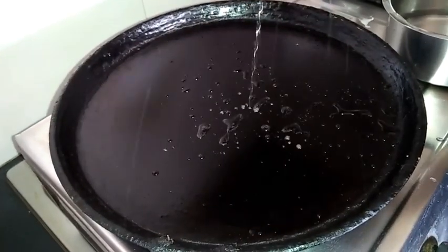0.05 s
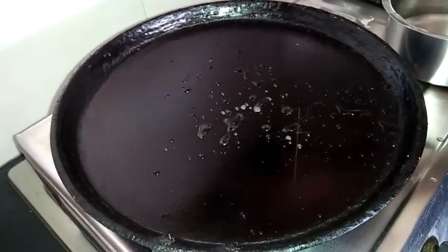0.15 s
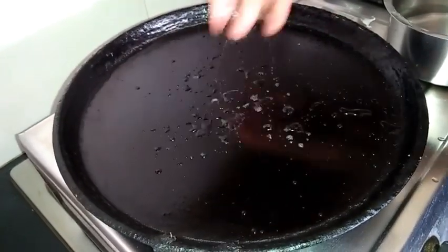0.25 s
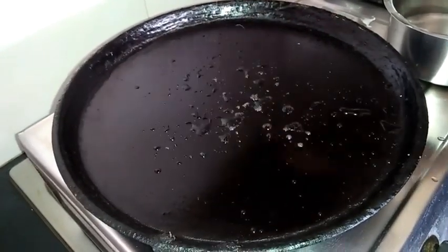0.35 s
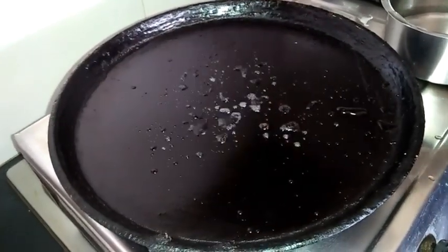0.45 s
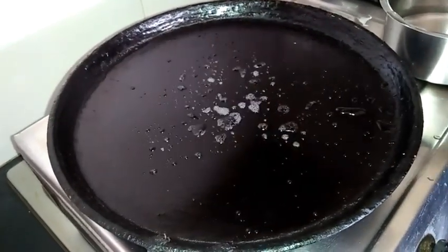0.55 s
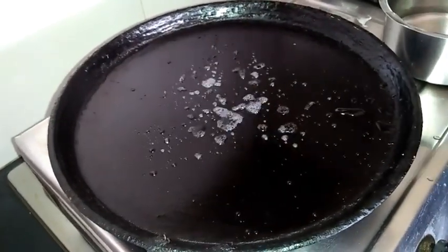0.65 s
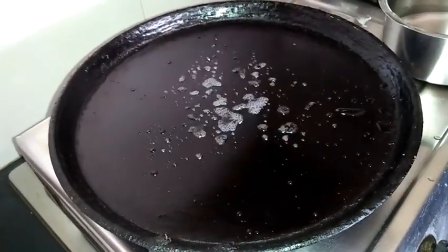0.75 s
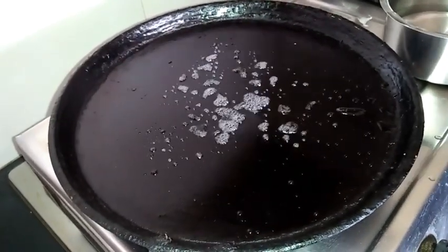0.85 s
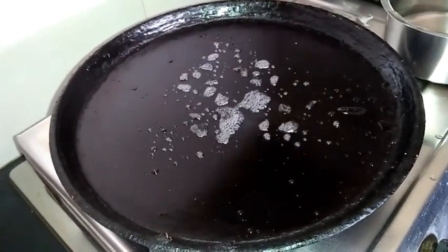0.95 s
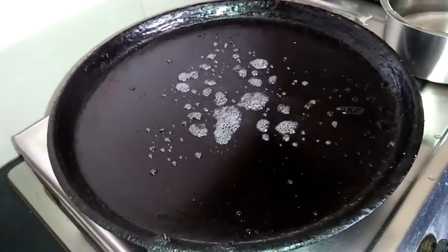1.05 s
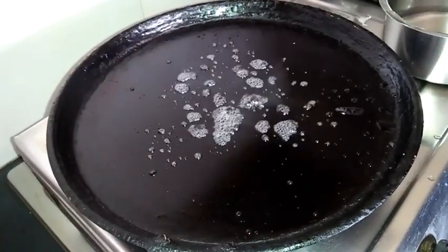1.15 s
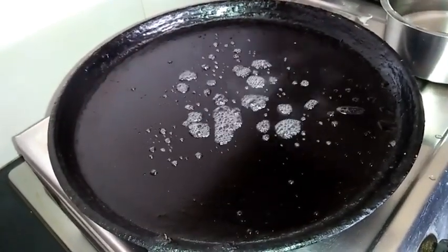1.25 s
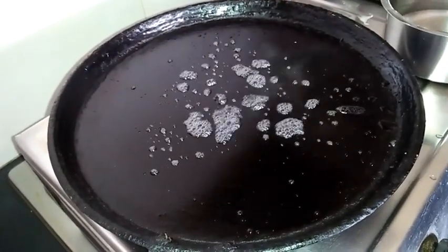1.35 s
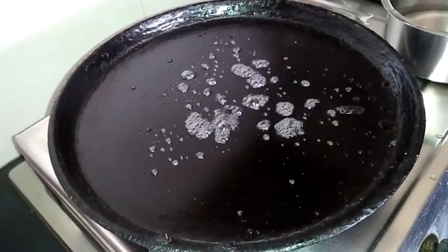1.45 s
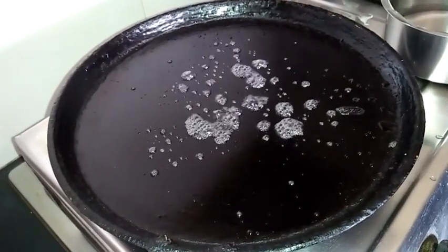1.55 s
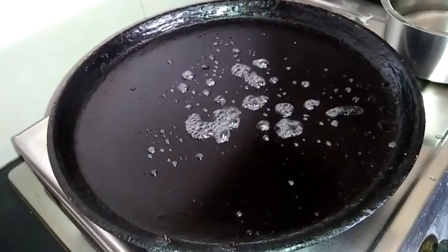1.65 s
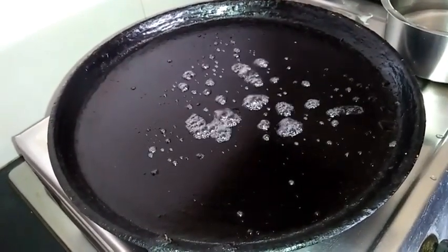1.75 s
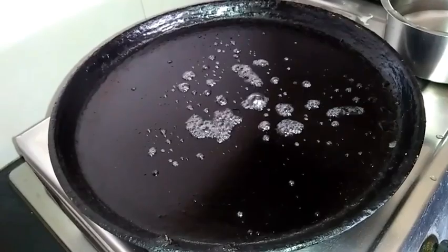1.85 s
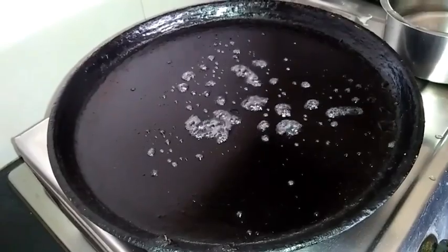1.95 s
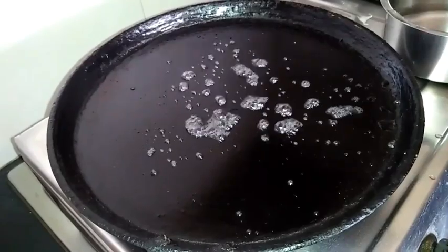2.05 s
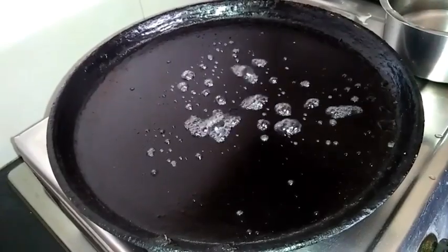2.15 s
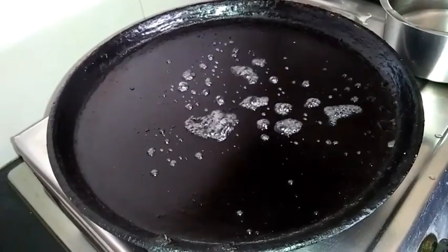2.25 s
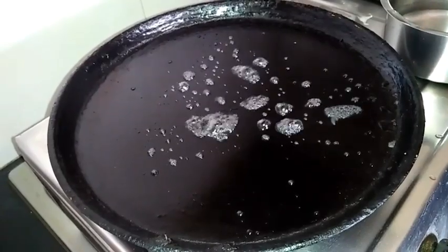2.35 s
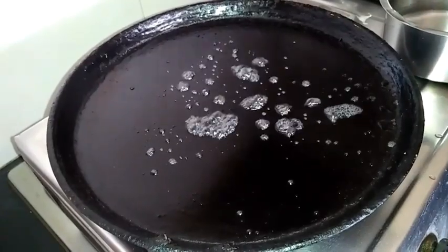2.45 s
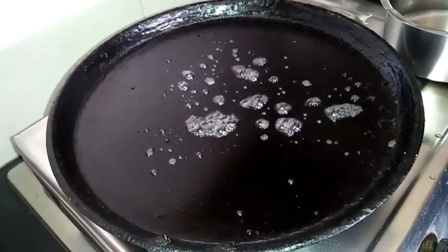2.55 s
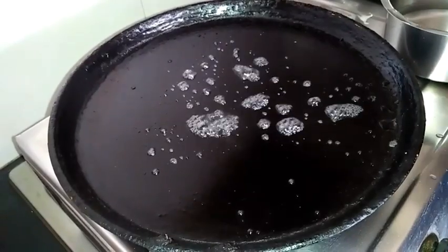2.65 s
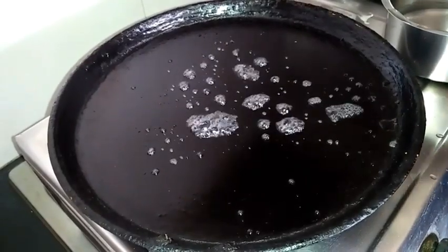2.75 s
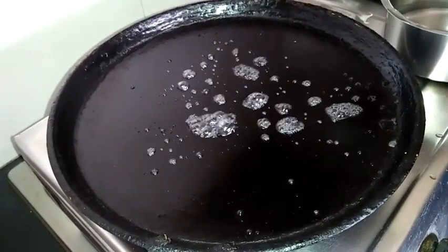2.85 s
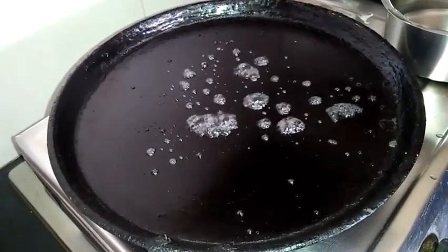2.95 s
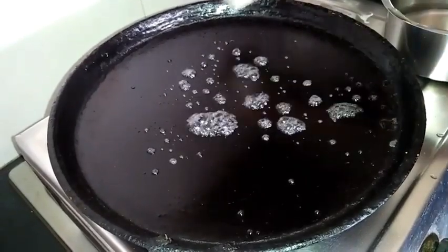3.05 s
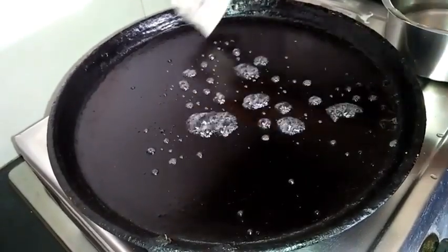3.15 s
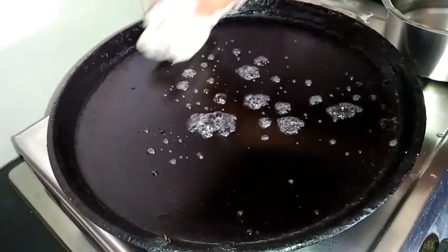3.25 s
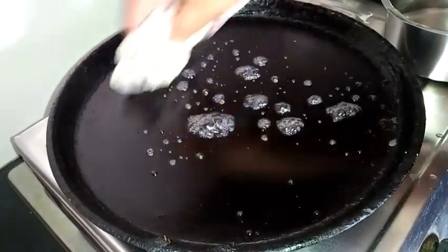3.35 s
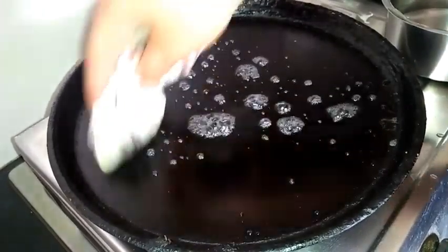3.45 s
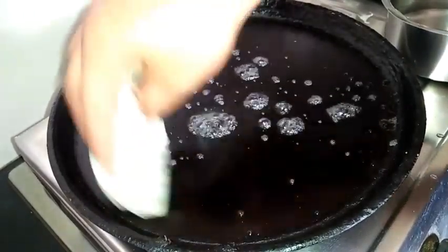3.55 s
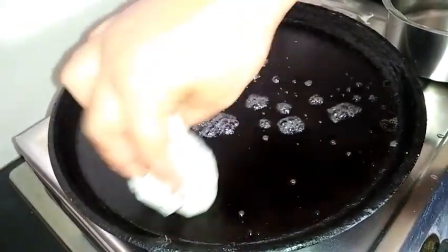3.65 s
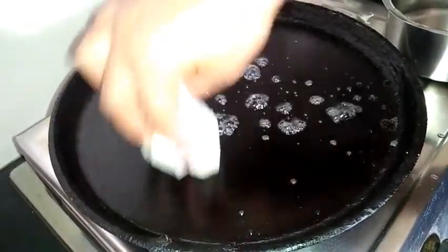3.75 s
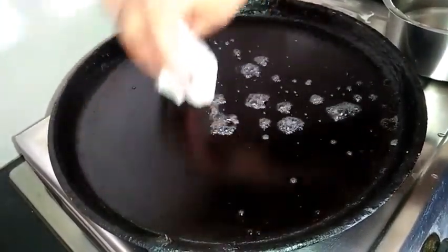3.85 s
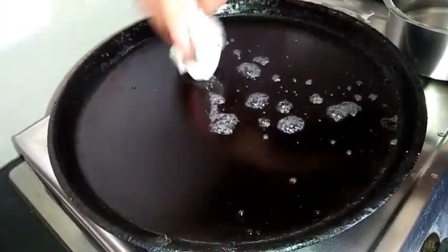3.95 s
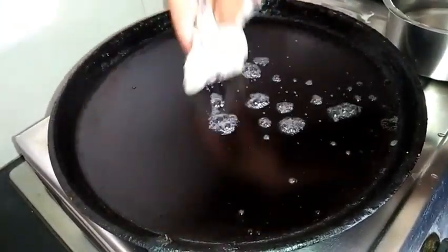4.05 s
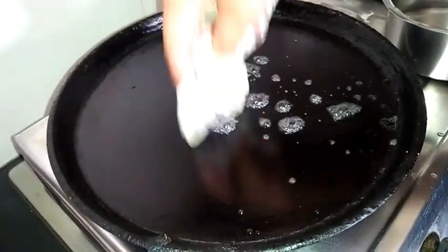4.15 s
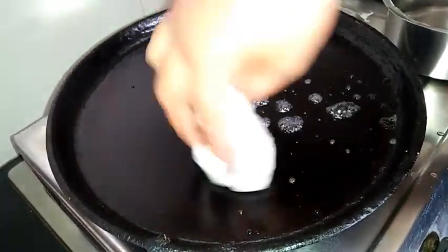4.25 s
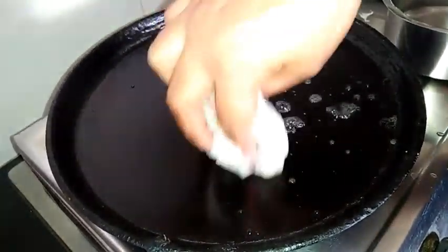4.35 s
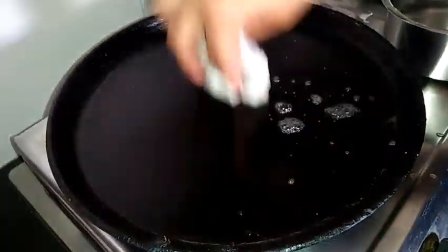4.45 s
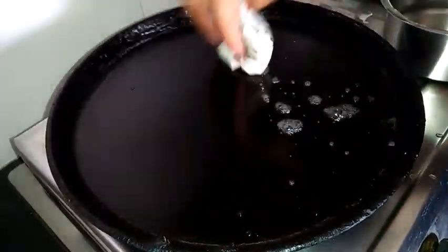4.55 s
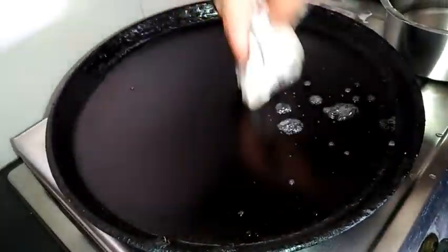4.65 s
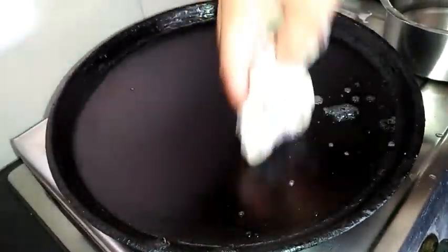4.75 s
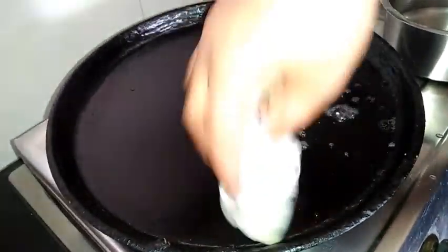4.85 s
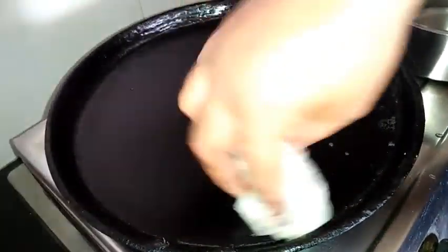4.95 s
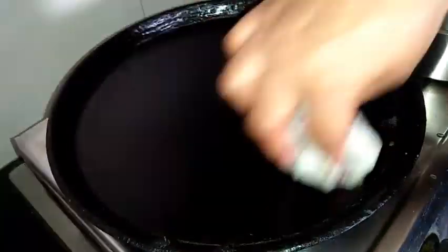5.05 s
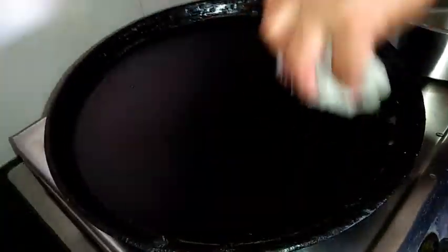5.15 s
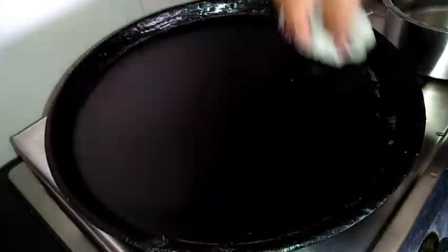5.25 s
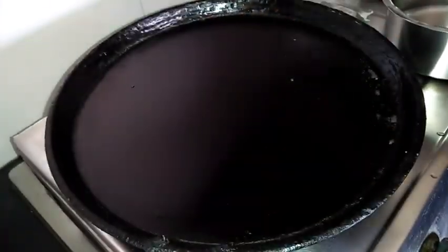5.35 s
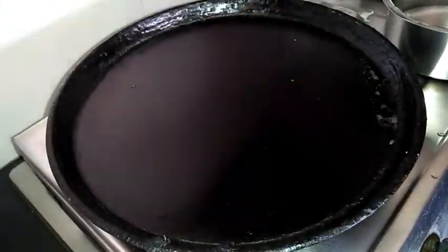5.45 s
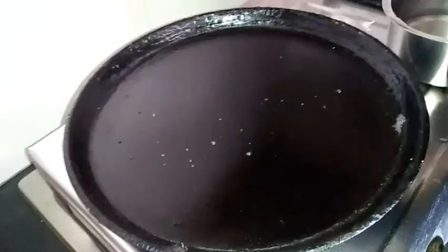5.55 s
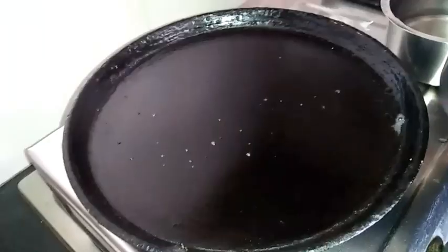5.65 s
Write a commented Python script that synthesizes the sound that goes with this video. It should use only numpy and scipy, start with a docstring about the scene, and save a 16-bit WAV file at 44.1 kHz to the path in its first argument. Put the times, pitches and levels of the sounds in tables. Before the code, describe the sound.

Water sizzles on a hot cast-iron griddle, heard close in a small, quiet kitchen. It begins as a faint, high hiss, and a steel bowl clinks lightly at about 0.3 seconds, ringing faintly afterwards. The sizzle builds until 1.5 seconds, with light bubbling underneath and many tiny spits. One sharp snap stands out at 1.8 seconds, then the hiss eases and keeps crackling.

At 3.4 seconds a wet cloth lands with a soft knock and the hiss rises. Short, quiet rasping strokes follow until 5.3 seconds. The sizzle surges in waves, loudest around 4.2 and 4.8 seconds, with hoarse spurts of steam and sharp pops near 4.2 and 4.5 seconds. The griddle knocks dully on the stove a few times, most clearly at 4.4 seconds. From 5.4 seconds the hiss drops away quickly, leaving one last faint crackle at about 5.6 seconds.

```python
"""Water sizzles on a hot cast-iron griddle in a small kitchen: flicked drops boil, spit and shrink,
and their countless bursting bubbles merge into a hiss. A steel water bowl clinks and sings faintly
in its normal modes. A wet cloth rasps over the iron and presses the puddles flat: the sizzle surges,
trapped steam whistles out and the griddle knocks on the stove. Wiped dry, the iron falls quiet,
and a last bit of water crackles."""
import sys
import numpy as np
from scipy import signal
from scipy.fft import rfft, irfft
from scipy.io import wavfile
from scipy.ndimage import uniform_filter1d

SR = 44100
rng = np.random.default_rng(int(sys.argv[2]) if len(sys.argv) > 2 else 0)


def store_pcm(level_fs):
    """Save levels as 16-bit WAV."""
    pcm = np.round(np.clip(level_fs, -1, 1) * 32767).astype(np.int16)
    wavfile.write(sys.argv[1], SR, np.atleast_2d(pcm).T)


N = 251186
T = np.arange(N) / SR
HZ = np.maximum(np.fft.rfftfreq(2 * N, 1 / SR), 1)

# Normal modes of the steel bowl. Each row: frequency in Hz, level in dB, t60 in seconds.
BOWL_MODES = [(1259, -14, .55), (1698, 0, .54), (2108, 1, .19), (3020, -17.5, .29), (3345, -17, .18),
              (3898, -13, .14), (4097, -12, .07), (4305, -8, .09)]


def sizzle():
    """Shot noise: bubbles burst in spurts, and the harder the water boils, the denser they come."""
    # Spectra of the hiss and of the lower simmer. Each row: frequency in Hz, level in dB.
    hiss_spectrum = [(1800, -49), (2900, -12.5), (3700, -22), (4500, -23), (5600, -16), (6600, -12),
                     (7600, -5), (8900, -2), (10500, -5.5), (12300, -7), (14400, -7)]
    simmer_spectrum = [(90, -25), (150, -17), (220, -27), (300, -14), (390, -21.5), (700, -8), (950, -3.5),
                       (1600, -1), (2150, 0.5), (2600, -6), (3600, -7), (4600, -24), (6000, -24.5)]
    boil_db, flutter_db, coarse_db, fine_db = boiling()
    vigour_db = boil_db + 50
    rate = 4200 * undb(.7 * vigour_db)  # bursts a second
    spurts = undb(.79 * walk(55) + .47 * walk(200)) * unit(sputter(rate=55, size_db=-7, t60=.11))
    pops = spurts * bursts(rate, spread_db=2.5, steam_db=2)
    wide = spurts * bursts(rate, spread_db=10, steam_db=12)
    # The skin of free drops snaps in dry crackles; crushed drops do so less.
    crackle = chirps(rate=420, centre_hz=9000, scatter=.3, spread_db=3.2, life_s=.0007, glide=10)
    # Steam escapes from under the drops in hoarse puffs with a trace of pitch.
    puffs = chirps(rate=70, centre_hz=8100, scatter=.28, spread_db=3.2, life_s=.009, glide=8, hoarse=.07)
    hard_db = np.maximum(vigour_db, 0)
    fizz = pops + crackle * undb(-10.5 - .1 * hard_db) + puffs * undb(-8 - .5 * hard_db)
    fizz = walls(fizz, wet_db=-9, t60=.2, spots=4)
    fizz += undb(-4) * np.array([[1], [-1]]) * shape(wide, above(4160))
    # Large bubbles sound low, fine spray high.
    colour, small, finest = response(hiss_spectrum), above(7660), above(11570)
    bands = [(1 - small, coarse_db - .5), (small - finest, -1), (finest, fine_db - .3)]
    hiss = sum(unit(shape(fizz, colour * band)) * undb(db + 1.4 * walk(40)) for band, db in bands)
    # The puddles flutter and blip against the griddle and set it ringing.
    flutter = unit(pops + spurts * bursts(rate, spread_db=4.5, steam_db=-10))
    blips = chirps(rate=260, centre_hz=1400, scatter=1.1, spread_db=3.3, life_s=.012, glide=4)
    flutter = walls(flutter + undb(-11.5) * blips, wet_db=-5, t60=.2, spots=4)
    simmer = unit(shape(flutter, response(simmer_spectrum) * griddle(iron_db=8, bowl_db=10)))
    return undb(boil_db) * hiss + simmer * undb(flutter_db - 1.24 + .55 * walk(28))


def boiling(gather_s=.97, cloth_down_s=3.368, cloth_up_s=5.35, attack_s=.15):
    """Incoherent sources add in power. In dB: hiss, flutter, and coarse and fine shares of the hiss."""
    # Free puddles spread, stall, shrink and are wiped away. Each row: time in seconds, level in dB.
    puddle_levels = [(0, -67.5), (.25, -61.5), (.5, -60), (.8, -52.5), (1.05, -49.5), (1.44, -46.5),
                     (1.65, -50), (2.02, -52.5), (2.07, -58), (2.16, -55.5), (2.42, -56), (2.95, -56),
                     (3.35, -54.5), (4.9, -51.5), (5.4, -55), (5.55, -108)]
    # Drops flare up and boil off. Each row: start in seconds, level in dB, t60 in seconds.
    flares = [(0.295, -58, 1.4), (.585, -56.5, 0.71), (2.165, -56, 1.1), (2.379, -52.5, 1.24),
              (2.585, -60.5, 1.8), (3.078, -60, 1.6), (3.455, -65, .25), (5.629, -62, 1.9)]
    # Crushed puddles boil off in one swell. Each row: start and length in seconds, level in dB,
    # flutter and fine spray in dB relative to that level.
    crushes = [(3.769, 0.47, -44, -9.5, -8), (3.95, 0.22, -42, -11, -1), (4.123, 0.22, -37, -14, -5),
               (4.296, 0.37, -38, -6.5, -8), (4.604, 0.27, -42, -9.5, -0.5), (4.728, 0.36, -35, -17, -1.5),
               (5.067, 0.33, -37, -20, -2)]
    puddle_db, = curves(puddle_levels)
    flare_power = sum((undb(db) * fade(t60, s)) ** 2 for s, db, t60 in flares)
    free = np.sqrt(undb(puddle_db) ** 2 + flare_power)
    vigour_db = 20 * np.log10(free) + 50
    fresh = np.clip(1 - T / gather_s, 0, 1)  # drops spray finely until they gather into puddles
    contact = np.clip((T - cloth_down_s) / attack_s, 0, 1)
    contact *= np.where(T < cloth_up_s, 1, fade(t60=.23, start=cloth_up_s))
    # Each row: hiss amplitude, then flutter, coarse bubbles and fine spray in dB relative to it.
    waters = [
        (free, -10.5 - .2 * vigour_db, -8 + .41 * vigour_db, -8 + 10.5 * fresh),
        (undb(-46.5) * contact, -11.5, -13, -4.5),  # the wet cloth hisses while it lies on the iron
    ]
    for s, length, db, flutter_db, spray_db in crushes:
        waters.append((undb(db) * swell(s, length), flutter_db, -13, spray_db))  # few large bubbles
    power = 0
    for amplitude, *shares_db in waters:
        power += np.array([(amplitude * undb(db)) ** 2 for db in (0, *shares_db)])
    hiss, flutter, coarse, fine = 10 * np.log10(power)
    return hiss, flutter, coarse - hiss, fine - hiss


def bursts(rate, spread_db, steam_db):
    """A Poisson process: random clicks, most faint and a few loud, over smooth white noise."""
    sizes = undb(spread_db * np.minimum(rng.exponential(size=N), 6))
    clicks = (rng.random(N) < rate / SR) * sizes * rng.choice([-1, 1], N)
    return unit(unit(clicks) + undb(steam_db) * rng.standard_normal(N))


def chirps(rate, centre_hz, scatter, spread_db, life_s, glide, hoarse=.037):
    """Each bubble is a damped oscillator: a tiny unsteady tone with its own pitch, size and glide."""
    out, t = np.zeros(N), T[:SR // 16]
    wobble = walk(900)
    for when, size, pitch, length, bend, offset in rng.random((int(rate * N / SR), 6)):
        hz = centre_hz * np.exp(scatter * (2 * pitch - 1))
        i = int(offset * (N - len(t)))
        sweep_hz = hz * (1 + glide * (bend - .5) * t + hoarse * wobble[i:i + len(t)])
        tone = np.sin(2 * np.pi * np.cumsum(sweep_hz) / SR)
        age = t / (life_s * (length + .55))
        amplitude = undb(-spread_db * np.log(max(size, .03)))
        add(out, when * N / SR, amplitude * age * np.exp(-2 * age) * tone)
    return unit(out)


def sputter(rate, size_db, t60):
    """Amplitude modulation by small fits of boiling: each starts at once and decays exponentially."""
    fits = (rng.random(N) < rate / SR) * rng.exponential(size=N)
    power = np.abs(signal.oaconvolve(fits, fade(t60 / 2)[:SR // 4])[:N])
    return np.sqrt(1 + undb(size_db) ** 2 * power)


def spits(width_hz=4800, click_s=.00024, spatter_attack_s=.0008, hard_db=-18):
    """Impulsive sources: a drop blows apart with a click, a spatter and, if hard, a bright snap."""
    # Spitting drops. Each row: start in seconds, level in dB, pitch in Hz,
    # then the spatter and the crack on the iron in relative dB.
    drops = [(.0462, -43, 8500, -14, -30), (.297, -43, 11300, -10, -25), (.4003, -40, 8900, -16, -36),
             (.732, -35, 8300, -12, -32), (.779, -37, 8600, -13, -32), (.974, -37, 9000, -11, -34),
             (1.034, -36, 9400, -8, -32), (1.064, -36, 8400, -11, -34), (1.124, -33, 8800, -17, -34),
             (1.1681, -34, 9000, -9, -32), (1.375, -34, 8800, -12, -34), (1.4815, -33, 8700, -12, -32),
             (1.505, -32, 8800, -10, -32), (1.688, -34, 8600, -13, -32), (1.723, -35, 8500, -11, -32),
             (1.7711, -16.5, 8800, -28, -50), (1.8745, -29, 8400, -9, -28), (1.8875, -35, 10200, -13, -34),
             (1.9073, -31.5, 9100, -10, -32), (2.1689, -35, 8000, -10, -34), (2.2188, -37, 9700, -10, -34),
             (2.243, -37, 8600, -15, -36), (2.2803, -37, 8600, -14, -36), (2.389, -40, 8700, -10, -36),
             (2.447, -41, 8500, -15, -36), (2.5878, -35, 9300, -11, -34), (2.592, -38, 9400, -10, -36),
             (2.609, -39, 9000, -9, -36), (2.644, -41, 9200, -8, -36), (2.671, -39, 9200, -9, -36),
             (2.7059, -35, 8700, -12, -34), (2.716, -41, 9200, -7, -36), (3.081, -39, 9900, -9, -36),
             (3.0907, -35, 8800, -11, -34), (3.1595, -36, 9000, -10, -34), (3.2441, -39, 9000, -18, -36),
             (3.3056, -30, 8900, -20, -36), (3.4621, -33, 9300, -12, -32), (3.4826, -30, 8400, -15, -32),
             (4.1622, -21, 9400, -14, -32), (4.1734, -10.5, 9400, -18, -35),
             (4.1828, -18.5, 10300, -15, -34), (4.3255, -25, 8600, -10, -32), (4.3515, -22, 8100, -10, -32),
             (4.5352, -13, 9200, -16, -17), (4.5385, -24, 11300, -8, -15), (4.8126, -17, 8700, -15, -32),
             (4.8318, -19, 8700, -15, -32), (4.9115, -22, 8800, -11, -32), (5.6649, -43, 9000, -14, -26)]
    out, cracks, t = np.zeros(N), np.zeros(N), T[:SR // 10]
    age = t / click_s
    snap_decay, spatter_decay, crack_decay = (fade(t60)[:len(t)] for t60 in (.005, .05, .014))
    spatter_envelope = spatter_decay * (1 - np.exp(-t / spatter_attack_s))
    bright = unit(noise(above(9500, order=8) * (1 - above(15000))))
    droplets = rng.standard_normal(N) * undb(2.5 * walk(400))
    iron = unit(noise(above(800, order=4) * (1 - above(3300, order=3))))
    for s, db, hz, spatter_db, crack_db in drops:
        part = rng.integers(N - len(t)) + np.arange(len(t))
        click = undb(-2) * age * np.exp(1 - age) * np.sin(2 * np.pi * hz * t)
        snap = undb(-21 + .6 * min(db - hard_db, 0)) * bright[part] * snap_decay
        spray = unit(resonator(resonator(droplets[part], hz, width_hz), hz, width_hz))
        spatter = undb(spatter_db) * spray * spatter_envelope
        add(out, s, undb(db) * (click + snap + spatter))
        add(cracks, s, undb(db + crack_db) * iron[part] * crack_decay)
    return walls(shape(out, above(6300, order=12)) + cracks, wet_db=-15, t60=.2)


def steam_jets(sag=.095):
    """Resonant flow noise: trapped steam whistles hoarsely, and its pitch sags as it runs out."""
    # Steam escapes from under a puddle or the cloth.
    # Each row: start and length in seconds, pitch and width of the resonance in Hz, level in dB.
    escapes = [(2.196, 0.05, 8200, 3000, -49.5), (2.248, 0.034, 7300, 1300, -56),
               (2.395, .05, 6840, 1500, -67), (2.618, 0.023, 6440, 1100, -61),
               (3.088, 0.054, 8650, 1300, -52.5), (4.136, 0.11, 10200, 4180, -41.5),
               (4.28, .018, 8830, 3600, -56), (4.318, 0.042, 7670, 3000, -38.5),
               (4.344, 0.064, 8000, 3300, -34.5), (4.753, 0.043, 9500, 3730, -33.5),
               (4.784, 0.14, 8360, 2950, -35), (4.888, 0.2, 8350, 3030, -38.5)]
    out = np.zeros(N)
    gas = bursts(4800, spread_db=3, steam_db=-4) * undb(1.5 * walk(250))
    for s, length, hz, width_hz, db in escapes:
        whistle = gas[(T >= s) & (T < s + length)]
        age = np.linspace(0, 1, len(whistle))
        for _ in range(3):
            whistle = resonator(whistle, hz * (1 + sag * (.5 - age)), width_hz)
        add(out, s, undb(db) * unit(whistle) * np.sin(np.pi * np.sqrt(age)))
    return walls(shape(out, above(5800)), wet_db=-7, t60=.15)


def cloth():
    """Stick-slip friction on rough iron excites two hollow resonances that shift as the hand travels."""
    # Each row: midpoint and half length in seconds, level in dB, low and high resonance in Hz.
    strokes = [(3.63, 0.056, -61.5, 910, 2150), (3.736, .045, -55.5, 1130, 2060),
               (3.933, 0.051, -50.5, 1090, 2140), (4.035, 0.039, -49, 1016, 2020),
               (4.21, 0.069, -44.5, 1300, 2070), (4.302, 0.057, -47, 1000, 1940),
               (4.365, .045, -47.5, 1050, 1580), (4.603, 0.046, -48, 1267, 2080),
               (4.76, 0.048, -50, 1200, 2010), (4.933, 0.072, -49.5, 1080, 1920),
               (5.03, 0.057, -50.5, 900, 1800), (5.123, 0.035, -52.5, 1240, 2180),
               (5.238, .032, -49.5, 1150, 1950), (5.295, 0.05, -52.5, 1020, 1650)]
    pressure = np.sqrt(sum((undb(db) * bump(s, half)) ** 2 for s, half, db, _, _ in strokes))
    low_hz, high_hz = curves([(s, low, high) for s, _, _, low, high in strokes])
    slips = bursts(1100, spread_db=1.5, steam_db=-6) * undb(2.8 * walk(90))
    colour = response([(400, -55), (900, .5), (1250, 1.5), (2200, 7),
                       (3000, 5), (3900, 3.5), (5000, -18), (8000, -39.5)])
    rasp = unit(shape(slips, colour * griddle(iron_db=3, bowl_db=15)))
    low = unit(resonator(rasp, low_hz * (1 + .03 * walk(30)), width_hz=95))
    high = unit(resonator(rasp, high_hz * (1 + .02 * walk(30)), width_hz=130))
    return unit(undb(-3) * rasp + low + undb(-1) * high) * pressure


def knocks(pad_s=.0078):
    """Impact excitation: the pressed griddle rocks and rattles, and the stove thumps under it."""
    # Each row: start in seconds, level in dB, weight of the deep thump in dB, t60 in seconds.
    blows = [(3.033, -62.5, -3, 0.42), (3.403, -39, 11, 0.31), (3.454, -54.5, 24.5, 0.39),
             (3.505, -71, 32, .12), (3.949, -54, 3, 0.38), (4.438, -34.5, -1.5, 0.23), (4.528, -49.5, 3, 1),
             (4.643, -44, -21.5, 0.55), (5.631, -64.5, 21, 0.3)]
    # Spectrum of the rattle. Each row: frequency in Hz, level in dB.
    rattle_spectrum = [(60, -23.5), (150, -7.5), (215, -15), (275, -3), (370, -6), (600, 3), (950, 1),
                       (1400, -2), (1900, 0.5), (2700, -11.5), (4500, -25.5), (7000, -73)]
    rattle = sum(undb(db) * fade(t60, s) for s, db, _, t60 in blows)
    thump = sum(undb(db + deep_db) * fade(t60, s) for s, db, deep_db, t60 in blows)
    rattle, thump = uniform_filter1d(np.array([rattle, thump]), int(pad_s * SR))  # the cloth pads blows
    body = response(rattle_spectrum) * griddle(iron_db=9.5, bowl_db=-1)
    iron = unit(shape(bursts(1500, spread_db=3, steam_db=2), body))
    stove = unit(noise(above(46, order=10) * (1 - above(175, order=4))))
    return iron * rattle + undb(-26) * stove * thump


def griddle(iron_db, bowl_db):
    """Modal response of the iron, with the bowl's longest-lived modes in sympathetic resonance."""
    # Normal modes of the griddle. Each row: frequency in Hz, level in dB, t60 in seconds.
    iron_modes = [(190, -6, .25), (279, -2, .45), (410, -5, .3), (554, -6, .35), (615, -6, .35),
                  (775, -10, .25), (946, -3, .15), (1036, -9, .3), (1328, -10, .3), (1775, -9, .3)]
    modes = [(hz, undb(db + iron_db), t60) for hz, db, t60 in iron_modes]
    modes += [(hz, undb(bowl_db) * t60, t60) for hz, _, t60 in BOWL_MODES]
    return 1 + modal_response(modes)


def bowl_taps(attack_s=.0012, db_per_octave=18):
    """Free vibration: each tap excites the bowl's modes, most strongly near the pitch it favours."""
    # Each row: start in seconds, level in dB, favoured pitch in Hz, scrape in relative dB.
    taps = [(.326, -47.5, 2720, -7.5), (0.3468, -46.5, 2650, -14), (.358, -53, 1460, -30),
            (0.3752, -53.5, 2680, -11)]
    out = np.zeros(N)
    attack = 1 - np.exp(-T / attack_s)
    for s, db, favoured_hz, scrape_db in taps:
        ring = np.zeros(N)
        for hz, mode_db, t60 in BOWL_MODES:
            gain = undb(mode_db - db_per_octave * abs(np.log2(hz / favoured_hz)))
            ring += gain * fade(t60) * np.sin(2 * np.pi * hz * T)
        scrape = unit(noise(above(520, order=4) * (1 - above(favoured_hz, order=4)))) * fade(t60=.11)
        add(out, s, undb(db) * attack * (ring + undb(scrape_db) * scrape))
    return out


def bowl_brush(level_db=-70.5):
    """Forced vibration: a light brush along the bowl builds up mainly its longest-lived modes."""
    modes = [(hz, t60 ** 2, t60) for hz, _, t60 in BOWL_MODES]
    friction = bursts(300, spread_db=3, steam_db=-6)
    singing = unit(shape(friction, modal_response(modes) * above(1700, order=6)))
    return undb(level_db) * singing * swell(start_s=.63, length_s=.79)


def walls(x, wet_db, t60, spots=1):
    """Reverberation from tiles and hob differs for each source spot; only its treble is wide."""
    spot, echo = rng.integers(spots, size=N), 0
    for k in range(spots):
        tails = (rng.standard_normal((2, N)) * fade(t60) * (T > .002))[:, :SR // 4]
        tails /= np.linalg.norm(tails, axis=1, keepdims=True)
        echo += signal.oaconvolve((x * (spot == k))[None], tails, axes=1)[:, :N]
    mid, side = echo
    return x + undb(wet_db) * (mid + np.array([[1], [-1]]) * shape(side, above(5700)))


def kitchen(rush_db=-74, rumble_db=-91, waver_db=6):
    """Ambient noise: the soft rush of the room and a low, fluttering rumble that swells now and then."""
    # Each row: frequency in Hz, level in dB.
    rush_spectrum = [(20, -22), (40, -5.5), (66, -21), (120, -9), (220, -19.5), (295, -4.5), (400, -11),
                     (900, -9), (1470, -13.5), (2480, -26), (5000, -26), (14000, -35.5)]
    # Each row: midpoint and half length in seconds, level in dB.
    rumble_swells = [(.18, 0.064, -83), (.63, .05, -79), (.91, 0.096, -72), (1.82, 0.077, -77),
                     (4.0, 0.12, -75), (4.55, .15, -69.5), (4.968, 0.15, -73), (5.22, 0.088, -81)]
    rush = unit(noise(response(rush_spectrum))) * undb(rush_db + .16 * walk(20))
    rumble = unit(noise(above(42, order=8) * (1 - above(110, order=4))))
    swells = sum(undb(db) * bump(s, half) for s, half, db in rumble_swells)
    return rush + rumble * np.hypot(undb(rumble_db), swells) * undb(waver_db * walk(11))


def resonator(x, hz, width_hz):
    """A single resonance whose centre frequency may move."""
    carrier = np.exp(2j * np.pi * np.cumsum(hz * np.ones(len(x))) / SR)
    pole = np.exp(-np.pi * width_hz / SR)
    return 2 * np.real(carrier * signal.lfilter([1 - pole], [1, -pole], x / carrier))


def modal_response(modes):
    """Superposition of resonances, each given by frequency in Hz, gain and t60 in seconds."""
    return sum(gain / (1 + 2j * np.pi * (HZ - hz) * t60 / np.log(1000)) for hz, gain, t60 in modes)


def response(points):
    """Minimum-phase response through points of frequency in Hz and level in dB."""
    hz, db = np.transpose(points)
    cepstrum = irfft(np.log(undb(np.interp(np.log(HZ), np.log(hz), db))))
    cepstrum[1:N] *= 2
    cepstrum[N + 1:] = 0
    return np.exp(rfft(cepstrum))


def above(hz, order=16):
    """Smooth high-pass response; one minus it is the complementary low-pass."""
    return 1 / (1 + (hz / HZ) ** order)


def shape(x, gain):
    """Linear filtering: multiply the spectrum by a frequency response."""
    return irfft(rfft(x, 2 * N) * gain)[..., :N]


def noise(gain):
    """Gaussian noise coloured by a frequency response."""
    return shape(rng.standard_normal(N), gain)


def fade(t60, start=0):
    """Exponential decay, 60 dB in t60 seconds."""
    return (T >= start) * np.exp(-np.log(1000) * np.clip((T - start) / t60, 0, 10))


def swell(start_s, length_s, skew=.71):
    """Half-sine envelope; with a skew under 1 it rises faster than it falls."""
    return np.sin(np.pi * np.clip((T - start_s) / length_s, 0, 1) ** skew)


def bump(middle_s, half_s):
    """Gaussian envelope."""
    return np.exp(-((T - middle_s) / half_s) ** 2)


def walk(rate):
    """Smooth random modulation with a spread near 1."""
    step = max(int(SR / rate), 1)
    return .988 * uniform_filter1d(rng.standard_normal(N)[np.arange(N) // step], step)


def curves(table):
    """Linear interpolation of each column over the times in the first."""
    s, *columns = np.transpose(table)
    return [np.interp(T, s, column) for column in columns]


def add(out, s, x):
    """Superpose a sound starting at s seconds."""
    i = max(int(s * SR), 0)
    out[..., i:i + x.shape[-1]] += x[..., :N - i]


def undb(db):
    """Decibels to amplitude ratio."""
    return 10 ** (np.asarray(db) / 20)


def unit(x):
    """Scale to rms 1."""
    return x / np.sqrt(np.mean(x ** 2))


def scene():
    """Superposition of everything on and around the griddle."""
    return sizzle() + spits() + steam_jets() + cloth() + knocks() + bowl_taps() + bowl_brush() + kitchen()


def record(dry, top_hz=14330):
    """Band limiting: a steep low-pass removes the highest treble."""
    return shape(dry, 1 - above(top_hz, order=220))


dry = scene()
out = record(dry)
store_pcm(out)
```